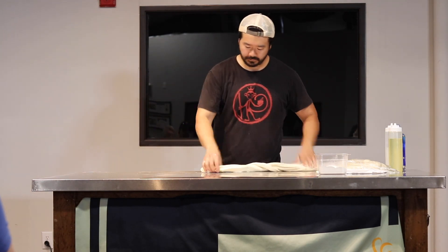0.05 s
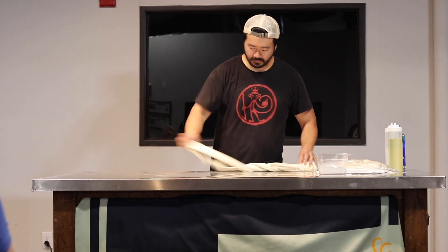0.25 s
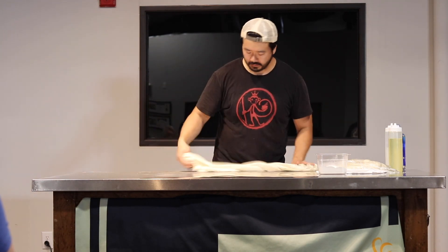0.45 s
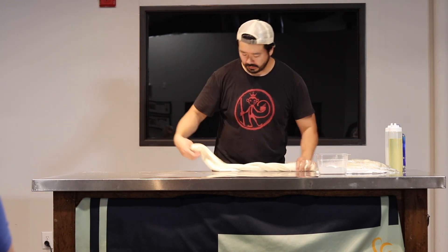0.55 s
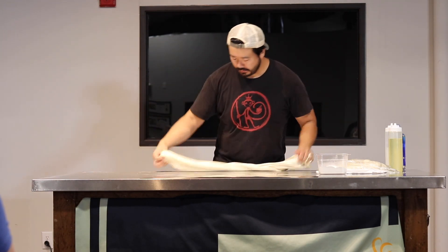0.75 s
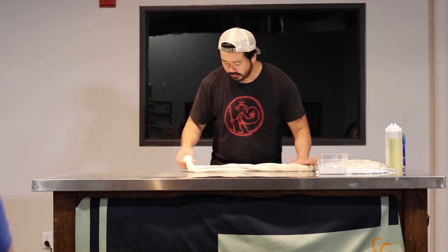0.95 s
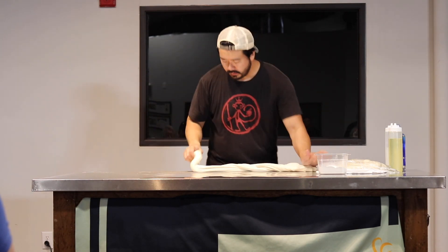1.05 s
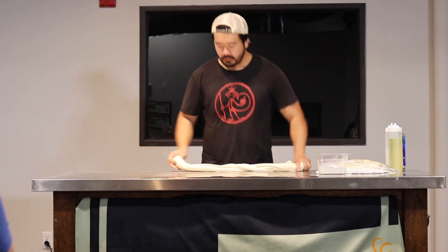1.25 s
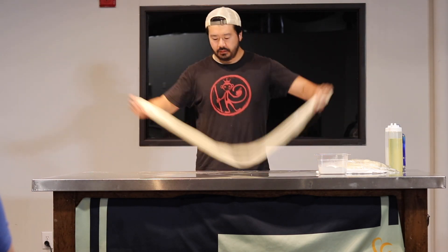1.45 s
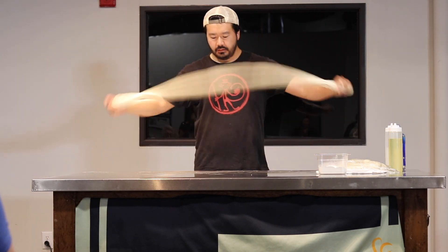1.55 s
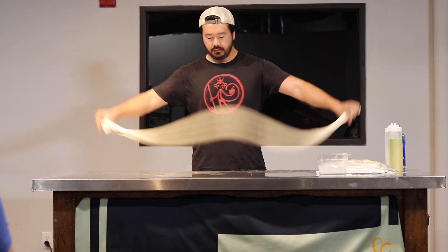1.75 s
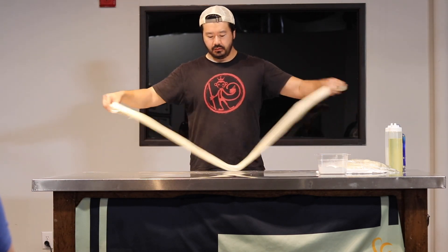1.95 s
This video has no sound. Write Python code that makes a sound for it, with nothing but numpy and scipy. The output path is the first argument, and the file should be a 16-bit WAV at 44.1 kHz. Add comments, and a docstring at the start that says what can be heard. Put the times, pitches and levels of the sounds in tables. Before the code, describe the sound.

Noodle dough slaps a steel-topped table with one loud crack after soft knocks and pats

```python
"""A large room with rumbling ventilation: a rope of noodle dough is worked on a steel-topped table.
An earlier slap dies away; soft knocks, pats, brushing, rubs and low table rumble follow.
After a soft swell the rope lands: sharp crack, heavy thump, brief ring of the steel and a room tail.
Knocks and landings push damped modes; clicks drive the crack's resonances.
Dull, bright and resonant bursts, sheet clatter, room tails and ventilation are shaped noise."""
import sys
import numpy as np
from scipy import signal
from scipy.fft import rfft, irfft
from scipy.io import wavfile

SR = 44100
rng = np.random.default_rng(int(sys.argv[2]) if len(sys.argv) > 2 else 0)


def to_wav(s):
    """Save 16-bit WAV."""
    ch = np.atleast_2d(s).T  # columns
    pcm = np.round(np.clip(ch, -1, 1) * 32767)  # PCM
    wavfile.write(sys.argv[1], SR, pcm.astype(np.int16))


N = 88200  # 2 s


def from_db(db):
    """Decibels to amplitude gain."""
    return 10 ** (np.asarray(db) / 20)


def rms_one(x):
    """Scale to unit rms."""
    return x / np.sqrt(np.mean(x ** 2) + 1e-20)


def at_hz(points, hz):
    """Interpolate a table on a log-frequency axis."""
    point_hz, value = np.transpose(points)
    return np.interp(np.log(np.maximum(hz, 1)), np.log(point_hz), value)


def seconds():
    """Time of each sample."""
    return np.arange(N) / SR


def bins_hz():
    """Frequency of each spectral bin."""
    return np.arange(N // 2 + 1) * SR / N


def filtered_noise(gain):
    """White noise weighted by a gain per bin, at unit rms."""
    white = rfft(rng.standard_normal(N))
    return rms_one(irfft(white * gain, N))


def noise(spectrum):
    """Unit-rms noise with a tabulated spectrum."""
    return filtered_noise(from_db(at_hz(spectrum, bins_hz())))


def resonant_noise(centre_hz, width_hz):
    """Unit-rms noise in one resonance; width at half amplitude."""
    return filtered_noise(1 / (1 + (2 * (bins_hz() - centre_hz) / width_hz) ** 2))


def envelope(start_s, rise_s, t60_s):
    """Linear rise, then exponential decay by 60 dB in t60."""
    age_s = seconds() - start_s
    rise = np.clip(age_s / rise_s, 0, 1)
    return rise * np.exp(-np.log(1000) * np.maximum(age_s - rise_s, 0) / t60_s)


def ring(drive, hz, t60_s):
    """Two-pole mode: a unit click rings as a decaying sine of initial height 1."""
    radius = np.exp(-np.log(1000) / (t60_s * SR))
    w = 2 * np.pi * hz / SR
    return signal.lfilter([0, np.sin(w)], [1, -2 * radius * np.cos(w), radius ** 2], drive + 1e-18)


def slap():
    """The rope hits: crack, table modes, clatter of the sheet's dense higher modes, room tail."""
    # rope landing along its length: t/s, relative level/dB, contact time/ms
    landings = [(1.9125, 2.5, 2.65), (1.9192, -9, 2.6), (1.925, 0, 0.22), (1.9323, -0.5, 0.34)]
    # clatter spectrum: f/Hz, relative level/dB per Hz
    sheet_spectrum = [(50, -3), (150, 9.5), (350, 5), (600, -18), (950, 11), (1700, 1), (2500, -3.5),
                      (4400, -13), (5200, -22), (14000, -48)]
    # room-tail spectrum: f/Hz, relative level/dB per Hz
    hall_spectrum = [(55, -11), (150, 1.5), (400, 2), (900, -2), (1700, -7.5), (2600, -18), (4400, -22),
                     (5400, -28), (10000, -38), (15000, -42)]
    slap_s, sheet_rise_s, sheet_t60_s = 1.919, 0.0019, 0.19
    sheet_db, hall_db = -11, -17.5
    sheet_level = from_db(sheet_db) * envelope(slap_s, sheet_rise_s, sheet_t60_s)
    sheet = sheet_level * noise(sheet_spectrum)
    hall = room_tail(hall_spectrum, [(slap_s, hall_db)])
    return crack() + strike_table(landings) + sheet + hall


def crack():
    """Air squeezed out under the dough: clicks into short bright resonances, each with a hiss puff."""
    # cracks: t/s, relative level/dB
    cracks = [(1.9088, -23.5), (1.9174, 1.5), (1.9257, -12.5)]
    # resonances: f/Hz, relative level/dB, t60/s
    resonances = [(2242, -16, 0.029), (2970, -13, 0.014), (3705, -6.5, 0.0071), (4110, -9, 0.0093),
                  (4420, -9, 0.013)]
    # hiss spectrum: f/Hz, relative level/dB per Hz
    hiss_spectrum = [(1500, -20), (3000, 10.5), (5500, -6.5), (7000, -6), (11000, -9), (13500, -28),
                     (16000, -31)]
    click_db, hiss_db = 0.5, -14
    hiss_rise_s, hiss_t60_s = 0.00013, 0.014
    clicks, puffs = np.zeros(N), np.zeros(N)
    for t_s, db in cracks:
        clicks[int(t_s * SR)] += from_db(click_db + db)
        puffs += from_db(hiss_db + db) * envelope(t_s, hiss_rise_s, hiss_t60_s)
    ringing = sum(from_db(db) * ring(clicks, hz, t60_s) for hz, db, t60_s in resonances)
    return ringing + puffs * noise(hiss_spectrum)


def strike_table(blows):
    """Each blow is a smooth push into the table's modes; a longer contact sounds duller."""
    # table modes: f/Hz, relative level/dB, t60/s
    modes = [(64.6, -25.5, 0.55), (111, -20.5, 0.18), (142.7, -14.5, 0.14), (187.3, -21, 0.22),
             (291.1, -27, 0.54), (380, -20, 0.088), (473, -25, .3), (724, -19.5, 0.2), (814, -15, 0.053),
             (945, -11.5, 0.1), (1063, -15, 0.068), (1345, -21, 0.11), (1604, -13, 0.061),
             (1693, -12.5, 0.11), (1790, -25, 0.15), (1848, -42, .14), (2147, -24, 0.16), (3370, -26, 0.11)]
    force = np.zeros(N)
    for t_s, db, contact_ms in blows:
        push_scale_s = contact_ms / 4000  # a quarter of the contact
        age = np.maximum(seconds() - t_s, 0) / push_scale_s
        push = age * np.exp(-age)
        force += from_db(db) * push / push.sum()
    out = np.zeros(N)
    for k, (hz, db, t60_s) in enumerate(modes):
        sign = (-1) ** k
        out += sign * from_db(db) * ring(force, hz, t60_s)
    return out


def room_tail(spectrum, events):
    """Diffuse reverberation after each (t/s, level/dB); high octaves die first."""
    # reverberation time: f/Hz, t60/s
    room_t60 = [(100, 1.6), (1000, 1.03), (4000, 0.71), (12000, 0.16)]
    build_s = 0.019
    wash = rfft(noise(spectrum))
    octave = np.round(np.log2(np.maximum(bins_hz(), 64)))
    out = np.zeros(N)
    for k in np.unique(octave):
        t60_s = at_hz(room_t60, 2 ** k)
        power = sum((from_db(db) * envelope(t_s, build_s, t60_s)) ** 2 for t_s, db in events)
        out += np.sqrt(power) * irfft(wash * (octave == k), N)
    return out


def knocks():
    """Soft knocks of dough push the table's modes."""
    # knocks: t/s, relative level/dB, contact time/ms
    knock_blows = [(.154, -26, 0.47), (.1606, -7, 1.64), (.229, -22.5, 2), (.566, -19, 2.1)]
    return strike_table(knock_blows)


def soft_bursts(bursts, spectrum, room_db):
    """Noise bursts of one colour, each with its reverberation."""
    level = sum(from_db(db) * envelope(t_s, rise_s, t60_s) for t_s, db, rise_s, t60_s in bursts)
    events = [(t_s, db + room_db) for t_s, db, _, _ in bursts]
    return level * noise(spectrum) + room_tail(spectrum, events)


def dull_bursts():
    """Bass-heavy noise bursts: the first is the dying tail of an earlier slap, the last is the heavy thump as
    the rope lands, the rest are pats."""
    # bursts: t/s, level/dB, rise/s, t60/s
    dull_rows = [(0, -34, 0.0013, 0.17), (.156, -30.5, 0.002, 0.11), (.562, -44, 0.0057, 0.1),
                 (1.909, -19, 0.006, 0.24)]
    # spectrum: f/Hz, relative level/dB per Hz
    dull_spectrum = [(40, -30), (130, 17.5), (400, 5.5), (800, 4), (1400, -5.5), (2500, -12.5), (6000, -35),
                     (14000, -42)]
    return soft_bursts(dull_rows, dull_spectrum, room_db=-10)


def bright_bursts():
    """Brighter noise bursts: the tail of an earlier slap, then floury hands and dough brush the steel."""
    # bursts: t/s, level/dB, rise/s, t60/s
    bright_rows = [(0, -41, 0.0009, 0.068), (.153, -41.5, 0.001, 0.047), (.5545, -47, .002, .04),
                   (.561, -45.5, 0.0027, 0.045), (.641, -53.5, 0.0085, .1), (.93, -57.5, 0.012, 0.43),
                   (1.302, -54, 0.011, 0.15)]
    # spectrum: f/Hz, relative level/dB per Hz
    bright_spectrum = [(500, -6.5), (1600, 4), (3000, -4), (5000, -3.5), (7000, -14.5), (9500, -17.5),
                       (15000, -28)]
    return soft_bursts(bright_rows, bright_spectrum, room_db=-18)


def resonant_bursts():
    """Resonant noise bursts, each at its own pitch: rubs, and a soft swell leading into the slap."""
    # bursts: t/s, level/dB, rise/s, t60/s, centre f/Hz, width/Hz
    resonant_rows = [(.45, -70, 0.0088, 0.055, 8000, 3000), (0.909, -48.5, 0.016, 0.13, 840, 447),
                     (1.305, -65, 0.0074, .08, 8900, 700), (1.305, -59.5, 0.0061, 0.067, 4360, 1200),
                     (1.884, -36, 0.014, 0.17, 573, 200), (1.875, -49.5, 0.018, 0.31, 2140, 700)]
    out = np.zeros(N)
    for t_s, db, rise_s, t60_s, centre_hz, width_hz in resonant_rows:
        burst = envelope(t_s, rise_s, t60_s) * resonant_noise(centre_hz, width_hz)
        out += from_db(db) * burst
    return out


def handling():
    """Bass rumble of the table as the dough is handled: noise with a moving level."""
    # rumble level: t/s, level/dB
    rumble_level = [(0, -42), (.35, -38), (.45, -42.5), (.62, -41), (.75, -44), (.88, -49.5), (1.3, -43),
                    (1.55, -49.5), (2, -53)]
    # spectrum: f/Hz, relative level/dB per Hz
    rumble_spectrum = [(30, -44), (60, -15), (90, 2.5), (130, 2.5), (200, -4.5), (300, -8.5), (600, -23.5),
                       (2000, -55)]
    level_db = np.interp(seconds(), *np.transpose(rumble_level))
    return from_db(level_db) * noise(rumble_spectrum)


def ventilation():
    """Steady air noise, plus low room resonances it keeps going."""
    # air spectrum: f/Hz, relative level/dB per Hz
    air_spectrum = [(20, -35), (36, -9.5), (50, -5), (165, -1.5), (206, -11), (290, -5), (470, -15),
                    (870, -22), (1200, -23.5), (3000, -35), (4300, -36), (5400, -45.5), (7000, -48),
                    (15000, -60)]
    # room resonances: f/Hz, width/Hz, level/dB
    drones = [(56.7, 8, -47), (120.1, 15, -52), (257.5, 23, -52)]
    air_db = -44.5
    out = from_db(air_db) * noise(air_spectrum)
    for hz, width_hz, db in drones:
        out += from_db(db) * resonant_noise(hz, width_hz)
    return out


def scene():
    """Sum of all sources, one channel."""
    soft = knocks() + dull_bursts() + bright_bursts() + resonant_bursts()
    return (slap() + soft + handling() + ventilation())[None]


def record(dry):
    """Microphone: deepest bass lost, peaks softly held at full scale, then the top cut."""
    low_cut_hz, top_cut_hz = 29, 15750
    high_pass = signal.butter(2, low_cut_hz, "high", fs=SR, output="sos")
    lean = signal.sosfilt(high_pass, dry)
    held = lean / (1 + lean ** 8) ** (1 / 8)
    low_pass = signal.ellip(10, .2, 70, top_cut_hz, fs=SR, output="sos")
    return signal.sosfilt(low_pass, held)


dry = scene()
out = record(dry)
to_wav(out)
```